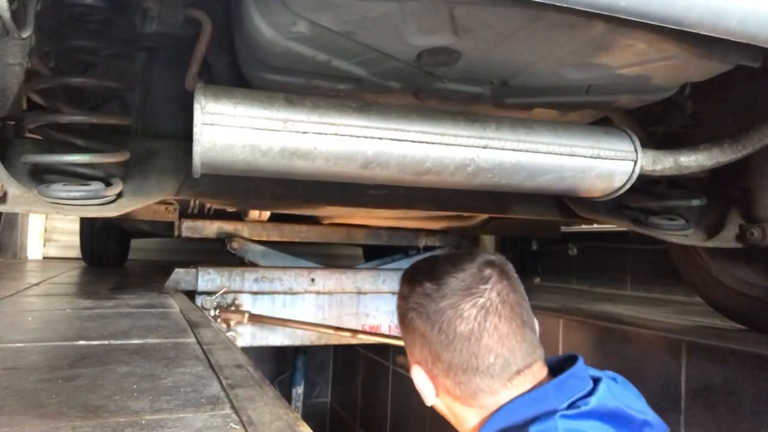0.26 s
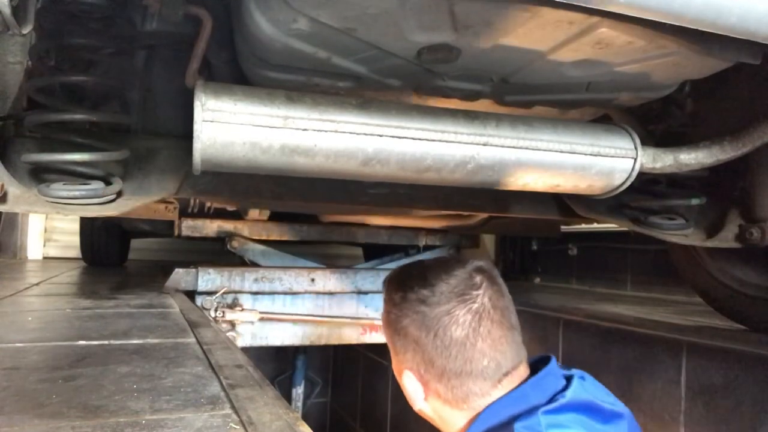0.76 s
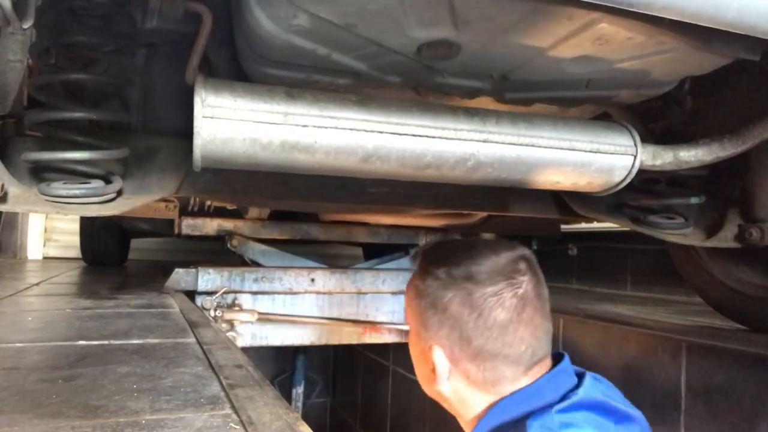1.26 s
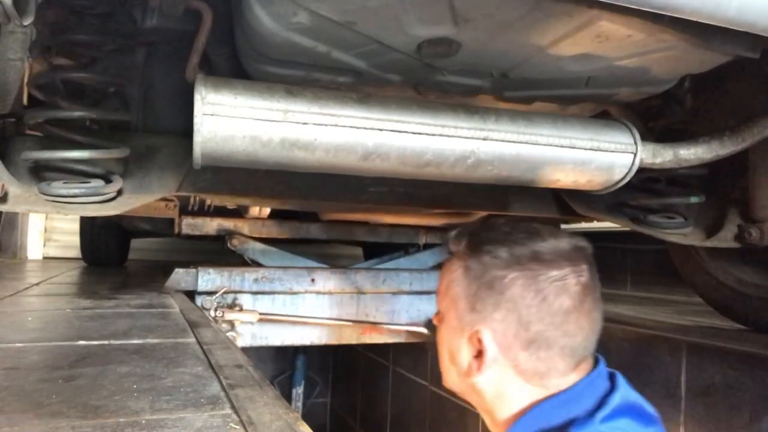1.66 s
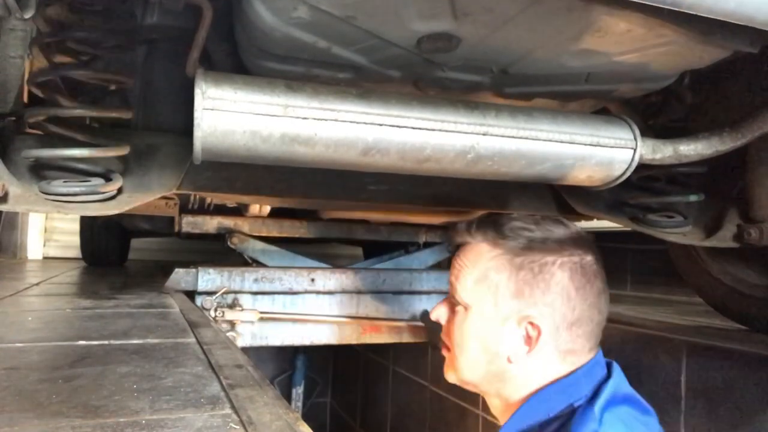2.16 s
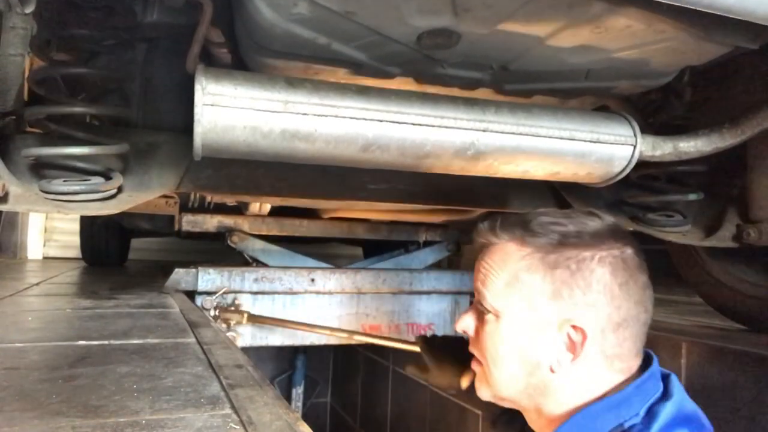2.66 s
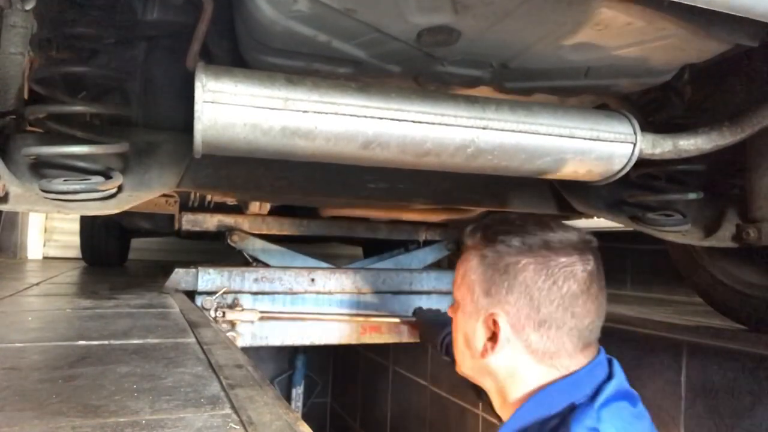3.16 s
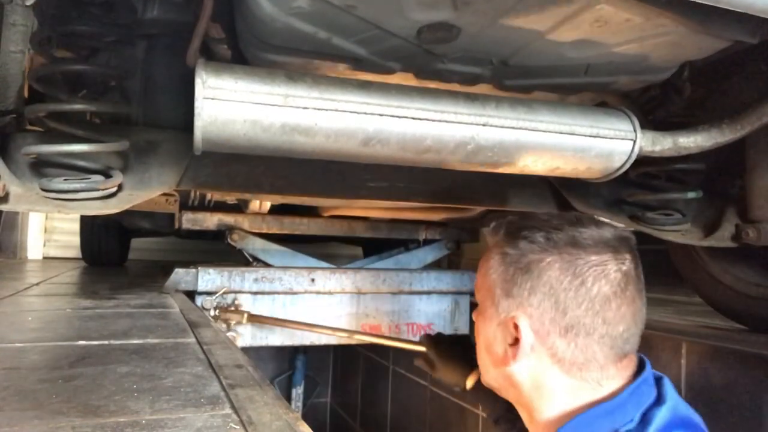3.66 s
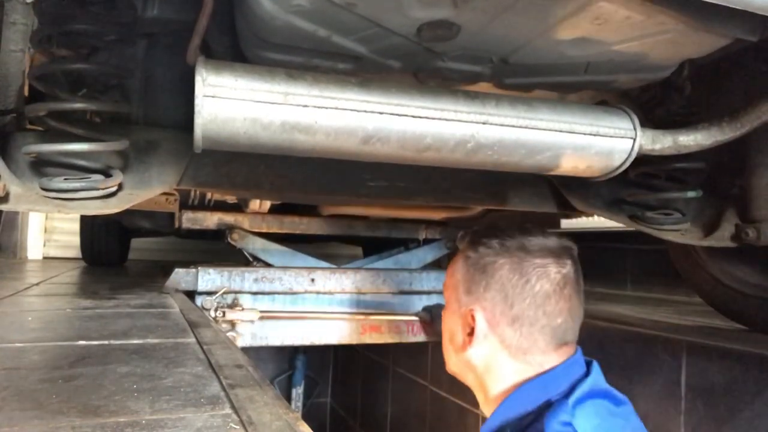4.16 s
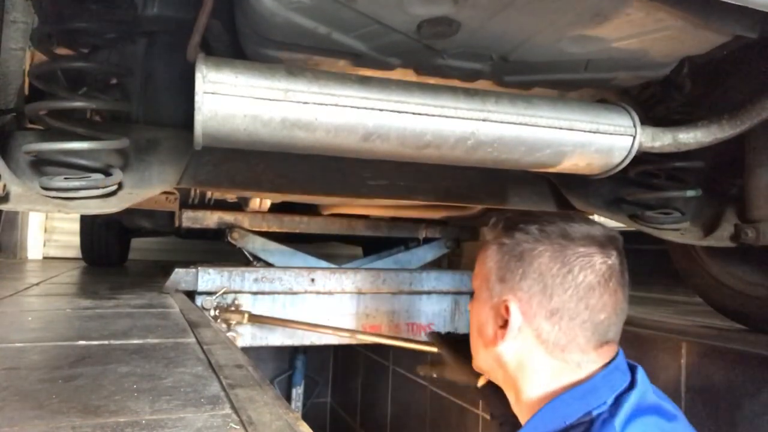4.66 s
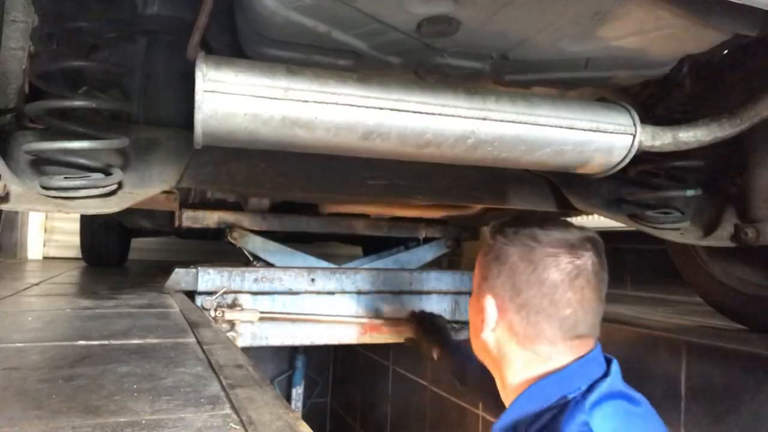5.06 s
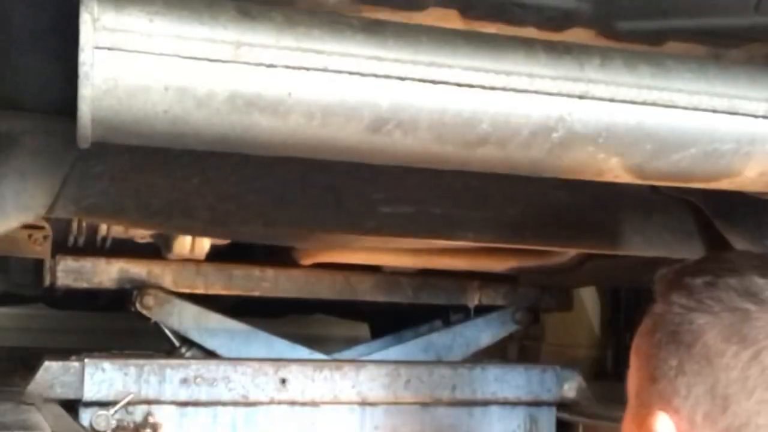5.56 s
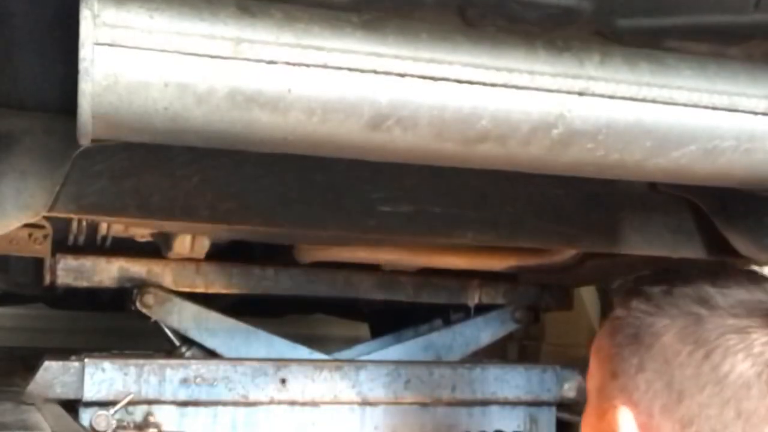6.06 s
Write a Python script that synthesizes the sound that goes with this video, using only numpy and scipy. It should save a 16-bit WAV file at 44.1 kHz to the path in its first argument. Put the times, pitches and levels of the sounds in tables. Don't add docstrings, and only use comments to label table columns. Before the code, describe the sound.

A hydraulic jack is pumped by hand beneath a car in a hard, narrow garage pit, heard fairly close. Steel lever knocks begin at 0.1 seconds and recur roughly every 0.4 to 0.5 seconds until 6.0, each preceded by light ticks as play is taken up, and often trailed by dull thunks or loose pin rattles. A sharp scrape comes at 0.4. At 0.93 the load slips with the loudest dense metallic crack; smaller cracks follow at 3.03 and a strong jerky cluster at 3.58 to 3.62. Short gritty scrapes fall between strokes, notably around 1.8, 3.5 and 4.6. Thin, very faint squeaks flick by, clearest near 0.5 and 2.8. Oil hisses faintly, surging around the blows. The car body answers with soft low booms and a quiet rumble. An extra thunk lands at 5.75. Everything has a short, dense echo over near-silent room air.

```python
import sys
import numpy as np
from scipy import signal
from scipy.fft import rfft, irfft, next_fast_len
from scipy.io import wavfile
from scipy.ndimage import uniform_filter1d

SR = 44100
rng = np.random.default_rng(int(sys.argv[2]) if len(sys.argv) > 2 else 0)


def makeup_ratio(level_db):
    decades = np.asarray(level_db, float) / 20
    return 10 ** decades


def bounce(signal):
    frames = np.transpose(np.atleast_2d(signal))
    limited = np.clip(frames, -1, 1)
    pcm = np.round(limited * 32767).astype(np.int16)
    wavfile.write(sys.argv[1], SR, pcm)


N = 278712

# start_s, strength_db, frame_weight_db, thud_db, brightness_db
KNOCKS = [(0.0824, -42, 2, 6, -12.5), (0.096, -33, 7.5, -5.5, -15), (0.4607, -35.5, -3.5, -4, -11.5),
          (0.8987, -31.5, 7, -7, -14), (1.3115, -37.5, -1, -4.5, -11), (1.7313, -32, 8.5, -3, -12),
          (2.134, -36.5, -3, -2, -13), (2.5518, -29.5, 4, -6, -13), (2.9783, -34.5, 0.5, -2, -13.5),
          (3.4214, -35, 6.5, -2, -10.5), (3.946, -36, 3, 3.5, -15), (4.0084, -44.5, 10, 1, -7),
          (4.4581, -34, 3, -6.5, -11.5), (5.0161, -37.5, 3.5, 3.5, -14), (5.5169, -33.5, 3, -9, -14),
          (6.0411, -38.5, 2.5, 0, -12)]
# start_s, strength_db, weight_db, brightness_db, edge_sharpness_db
CRACKS = [
    (0.9265, -17, -21, -1, -11),
    (0.9312, -17, -3.5, -10.5, -59),
    (0.939, -24.5, -9.5, -5, -13),
    (3.0206, -35.5, -9, 4, -3),
    (3.0333, -25.5, -6, 5.5, -13),
    (3.046, -29, -2.5, -3, -57),
    (3.5831, -25, -11, 6, -14.5),
    (3.588, -21.5, -7.5, -9, -29.5),
    (3.598, -26.5, -4, -4.5, -29.5),
    (3.6165, -36.5, -4.5, 1.5, -30.5),
]
HEAVY_PARTS = { "thud": (120, 330, 0.016, -0.31, [(179.3, -0.5, 0.33), (299, 0, 0.22), (338, -12.5, .6)]),
               "frame": (340, 800, .009, 9.5, [(425, -7, .18), (525, -11, .14), (561, -2, .24),
               (618, -5, .2), (664, -6, .2), (732, -13, .15)]),
               "beam": (400, 800, 0.0074, 2, [(430, -4, .15), (515, -1, .14), (559, -1, 0.24),
               (619.4, -2, 0.17), (740, -5, 0.1)]), "tube": (950, 1400, 0.004, 3.7, [(873, -12, 0.15),
               (1124, -8.5, 0.19), (1163.5, 1, 0.22), (1327, -10, 0.13)]),
               "bar": (950, 1100, .01, 6, [(1012, -4, .3), (1034, 0, .36)]), }
THIN_PARTS = { "plate": (930, 1500, 0.0052, -14.5, [(1030, 0, .35), (1311, -3.5, 0.034)]),
              "arm": (1290, 2680, 0.0039, -7, [(1800, 0.5, 0.16), (2290, -4.5, 0.11)]),
              "pin": (2175, 4440, .001, -21.5, [(3200, 3, 0.095), (4100, -6.5, 0.07)]),
              "sheen": (6730, 8850, 0.00078, -10, [(8000, -2.5, 0.069), (8000, -0.5, 0.061)]),
              "shank": (4500, 6400, 0.001, -7.5, [(4900, -1, 0.052), (5150, -1, 0.085),
              (6220, -1.5, 0.056)]), "slab": (780, 2320, 0.0021, -12, [(840, 0, .1), (1136, -2, .08),
              (1620, -2, .08), (2110, -3, .08)]), "ping": (2600, 3800, .0006, 13, [(3077, 2.5, 0.065),
              (3152, -1, 0.044), (2670, -15, 0.092), (3880, -8, 0.044), (5340, -7, 0.04)]),
              "top": (10800, 13800, .001, -12.5, [(11700, -.5, .04)]),
              "crest": (13800, 14000, .001, -20, [(14620, 0, .03)]),
              "socket": (3300, 3600, 0.0012, 18, [(2855, 4.5, 0.038), (3133, -3, 0.022), (3938, -5, 0.09)]),
              }
PARTS = {**HEAVY_PARTS, **THIN_PARTS}


def rms_one(x):
    return x / np.sqrt(np.mean(x ** 2) + 1e-20)


def loudest_one(x):
    return x / np.sqrt(uniform_filter1d(x ** 2, size=SR // 125).max())


def at_hz(points, hz):
    table_hz, values = np.array(points).T
    return np.interp(np.log(hz), np.log(table_hz), values)


def band(x, low_hz, high_hz, order=2):
    limits_hz = [low_hz, min(high_hz, 0.45 * SR)]
    return signal.sosfilt(signal.butter(order, limits_hz, "band", fs=SR, output="sos"), x)


def drift(rate_hz):
    r = np.exp(-80 * np.pi * rate_hz / SR)
    draws = rng.standard_normal(N // 40 + 2002)
    slow = signal.lfilter([1], [1, -2 * r, r * r], draws)[2000:]
    return np.interp(np.arange(N) / 40, np.arange(len(slow)), rms_one(slow))


def banded_noise(spectrum, patchy_db, rate_hz):
    edges_hz = np.geomspace(spectrum[0][0], min(spectrum[-1][0], 0.4 * SR), num=15)
    white = rng.standard_normal((2, N))
    out = 0
    for k, (low_hz, high_hz) in enumerate(zip(edges_hz, edges_hz[1:])):
        level_db = at_hz(spectrum, np.sqrt(low_hz * high_hz))
        gain = makeup_ratio(level_db + patchy_db * drift(rate_hz))
        out = out + gain * band(white[k % 2], low_hz, high_hz)
    return rms_one(out)


def pit(hz, size=SR):
    # pitch_hz, t60_s
    pit_t60 = [(150, 0.54), (500, 0.31), (1100, 0.27), (2000, 0.25), (3500, 0.23), (6500, 0.2),
               (13000, 0.16)]
    t = np.arange(size) / SR
    pit_tail = makeup_ratio(-60 * t / at_hz(pit_t60, hz))
    hall_tail = makeup_ratio(-30 - 60 * t / 0.37)
    fill_in = 1 - np.exp(-t / 0.0012)
    response = makeup_ratio(-18.5) * (pit_tail + hall_tail) * fill_in * rng.standard_normal(size)
    response[0] = 1
    return response


def quiet():
    # pitch_hz, level_db per Hz
    quiet_tone = [(240, -31.5), (400, 8.5), (545, -9.5), (906, -34.5), (1030, 4.5), (1490, -11.5),
                  (2840, -16.5), (7990, -11), (10200, -12.5), (14800, -15), (15800, -17)]
    return makeup_ratio(-70.5) * banded_noise(quiet_tone, patchy_db=2.5, rate_hz=4.8)


def rumble():
    # pitch_hz, level_db per Hz
    rumble_tone = [(15, -39.5), (25, -19.5), (54, 1.5), (87, 2), (226, -14), (318, -13), (477, -22),
                   (551, -31.5), (788, -32), (1020, -31.5), (1200, -15.5), (1560, -56.5), (2640, -120)]
    # time_s, level_db
    sway = [(0.0, -48), (0.35, -52), (0.93, -52), (1.09, -46), (1.18, -49.5), (1.49, -53.5), (2.59, -50),
            (2.75, -54), (3.06, -43.5), (3.2, -52), (4.01, -50), (4.49, -53.5), (4.68, -53), (4.94, -56.5),
            (5.1, -49.5), (5.53, -55), (6.02, -44.5), (6.32, -51.5)]
    sway_db = np.interp(np.arange(N) / SR, *np.transpose(sway))
    return makeup_ratio(sway_db - 0.5) * banded_noise(rumble_tone, patchy_db=0.0, rate_hz=2.1)


def surge(s, strength_db, top_db, follows, lag_s, rise, fall, rest_db):
    coarse = np.arange(0, N, 64)
    late_s = coarse[:, None] / SR - np.array(s) - lag_s
    top = top_db + follows * (strength_db - np.median(strength_db))
    peaks = top + np.minimum(rise * late_s, -fall * late_s)
    return np.interp(np.arange(N), coarse, np.maximum(peaks.max(axis=1), rest_db))


def hiss():
    # pitch_hz, level_db per Hz
    hiss_tone = [(410, -32.5), (700, 1), (852, -6.5), (984, -10), (1300, -12), (2800, -9.5), (4800, -17.5),
                 (5400, -10.5), (14800, -32.5), (16000, -40)]
    # time_s, level_db
    effort = [(0, 5), (.7, -2), (1.15, 2), (1.6, -4.5), (2.3, -1.5), (3.3, 2), (3.75, -3.5), (4.3, -2.5),
              (4.8, -1.5), (5.3, -3), (5.8, -2.5), (6.32, -1)]
    # top_db, share of the blow's strength swing, lag_s, rise (dB/s), fall (dB/s), rest_db
    hiss_surge = (-58, 0.3052, 0.57, 115, 107, -69)
    effort_db = np.interp(np.arange(N) / SR, *np.transpose(effort))
    start_s, strength_db = np.array([row[:2] for row in KNOCKS + CRACKS]).T
    level_db = effort_db + surge(start_s, strength_db, *hiss_surge)
    return makeup_ratio(level_db) * banded_noise(hiss_tone, patchy_db=0.0, rate_hz=17)


def booms():
    # start_s, pitch_hz, peak_db, t60_s
    boom_rows = [(0.106, 78.8, -38, 0.31), (0.462, 76, -34, 0.18), (0.907, 81.7, -32, 0.26),
                 (0.991, 63.1, -44, 1.5), (2.2, 62, -54, 1.5), (3.06, 64, -57, 1.5), (4.06, 62, -48.5, 1.5),
                 (5.05, 63, -49, 1.2), (1.327, 109.8, -45, 0.21), (.11, 334, -52, 0.64),
                 (.91, 334, -51, 0.84), (1.74, 334, -53, 0.72), (2.56, 334, -52, 0.62),
                 (3.43, 334, -56.5, .7), (3.96, 185, -43.5, 0.63), (3.96, 334, -53.5, 0.62),
                 (5.02, 338, -52.5, 0.64), (5.75, 312, -53.5, 0.67), (6.05, 306, -51, 0.61),
                 (1.737, 77, -36, 0.27), (2.14, 114.6, -44, 0.44), (2.557, 76, -40, 0.44),
                 (2.768, 107, -46.5, 0.34), (2.986, 119, -38.5, 0.18), (3.427, 80.3, -42.5, 0.44),
                 (3.66, 96, -42.5, 0.2), (3.95, 87.5, -37, 0.21), (4.01, 115, -40.5, 0.49),
                 (4.462, 84.8, -38.5, 0.23), (5.018, 112.7, -39.5, 0.74), (5.522, 78, -40.5, 0.31),
                 (5.756, 79.5, -41, 0.32), (5.769, 112.7, -42, 0.82), (6.044, 119, -39, 0.4)]
    t = np.arange(SR) / SR
    swell = 1 - np.exp(-t / 0.0066)
    out = np.zeros(N + SR)
    for start_s, hz, db, t60 in boom_rows:
        at = round(start_s * SR)
        out[at:at + SR] += makeup_ratio(db + 6.5 - 60 * t / t60) * swell * np.sin(2 * np.pi * hz * t)
    return out[:N]


def squeaks():
    # start_s, length_s, first_hz, toward_hz (about two thirds of the way is covered), level_db
    squeak_rows = [(.637, 0.068, 15000, 11000, -65), (1.488, .055, 10250, 15000, -69),
                   (2.308, 0.03, 13000, 12000, -66.5), (2.315, .05, 11000, 9560, -72),
                   (2.345, .03, 11000, 11000, -71), (2.3, .03, 10450, 10300, -76),
                   (0.494, .04, 11700, 11340, -55), (2.8, .04, 9000, 9500, -52),
                   (2.663, 0.046, 11800, 11750, -64), (3.79, .045, 6500, 6220, -65),
                   (4.204, .12, 3800, 2740, -72.5), (4.11, 0.06, 5620, 5600, -72),
                   (4.55, 0.12, 5350, 5300, -60), (4.63, 0.035, 3100, 3100, -58),
                   (4.58, .08, 6200, 6100, -64), (3.9, .06, 8050, 7200, -63), (4.83, .07, 2400, 2400, -71),
                   (5.4, .06, 2200, 2190, -70), (4.11, 0.037, 15000, 9370, -67),
                   (5.12, .05, 9000, 9900, -71), (5.171, .07, 18000, 8700, -66.5),
                   (6.217, 0.12, 23000, 9200, -66.5)]
    t = np.arange(N) / SR
    out = np.zeros(N)
    wobble = 1 + 0.004 * drift(60)
    flutter = makeup_ratio(4.5 * drift(70) + 0.5)
    for start_s, length_s, first_hz, toward_hz, db in squeak_rows:
        end_s = start_s + length_s
        times_s = [start_s - 0.01, start_s, start_s + 0.35 * length_s, end_s, end_s + 0.01]
        level = makeup_ratio(np.interp(t, times_s, [-110, db - 9, db, db - 9, -110]))
        part = np.clip((t - start_s) / length_s, 0, 1)
        hz = toward_hz + (first_hz - toward_hz) * np.exp(-part / 0.98)
        out += level * flutter * np.sin(2 * np.pi * np.cumsum(hz * wobble) / SR)
    return out


def scrapes():
    # start_s, end_s, scrape_db, top_db
    scrape_rows = [(0.383, 0.445, -47.5, -74), (0.63, 0.694, -69.5, -85), (1.788, 1.976, -55, -82),
                   (2.60, 2.728, -59, -67), (1.182, 1.392, -59, -66), (3.285, 3.285, -51, -65),
                   (3.517, 3.604, -51, -68), (3.833, 3.944, -56.5, -73), (4.065, 4.168, -64.5, -70),
                   (4.532, 4.663, -52, -73), (4.878, 5.012, -60.5, -62.5), (5.11, 5.25, -64.5, -81.5),
                   (5.58, 5.73, -57, -70), (5.746, 5.78, -58.5, -66), (6.184, 6.225, -63, -70)]
    # pitch_hz, level_db per Hz
    scrape_tone = [(710, -27), (1200, -6), (1980, -10.5), (2780, -7), (3510, -7.5), (5410, -8),
                   (8200, -11.5), (9500, -18), (12400, -52), (20900, -120)]
    t = np.arange(N) / SR
    grains = rng.standard_normal(N) * makeup_ratio(3 * drift(80))
    body = banded_noise(scrape_tone, patchy_db=1.5, rate_hz=7.2) * makeup_ratio(1.9 * drift(90) - 1.0)
    top = rms_one(band(grains, 7700, 13600))
    out = np.zeros(N)
    for start, end, db, top_db in scrape_rows:
        stroke = makeup_ratio(np.interp(t, [start - 0.012, start, end, end + 0.11], [-35, -4, -3, -35]))
        sliding = (t > start - 0.012) * (t < end + 0.07)
        out += stroke * sliding * (makeup_ratio(db) * body + makeup_ratio(top_db) * top)
    return out


def cracks():
    crack_law = {"plate": (-10, 2.5, 1, 0), "arm": (-6.5, 0.5, 0, 0), "slab": (-12, 1.2, -0.5, 0),
                 "pin": (0.42, 0, 0, 0), "sheen": (-2.5, 0.06, 1, 0.016),
                 "shank": (-1.8, -0.075, 0.77, 0.013), "top": (0.86, 0, 0, 0.91), "crest": (-6, 0, 0, 0.98)}
    # pitch_hz, width_hz, level_db over the burst
    slip_rings = [(1800, 40, 6.5), (2180, 45, 7), (2950, 60, 6), (3400, 35, 7.5), (4020, 68, 6),
                  (4250, 40, 6), (4650, 30, 6), (4860, 25, 5.5), (5300, 56, 7), (6270, 50, 7),
                  (7410, 45, 3.5), (7760, 54, 6), (8280, 80, 5.5)]
    t = np.arange(SR // 2) / SR
    swell = 1 - np.exp(-t / 0.002)
    shape = swell * (1 + makeup_ratio(-4) * np.exp(-t / 0.014))
    out = np.zeros(N + SR)
    for start_s, db, *colour in CRACKS:
        at = round((start_s - 0.0015) * SR)
        for name, (over_db, *shares) in crack_law.items():
            low_hz, high_hz = PARTS[name][:2]
            dense = band(pit(np.sqrt(low_hz * high_hz), size=SR // 2), low_hz, high_hz, order=5)
            gain = makeup_ratio(db + over_db + np.dot(colour, shares))
            out[at:at + len(t)] += gain * loudest_one(dense * shape)
    burst = out[:N] * makeup_ratio(2 * drift(250) - 2.5) + 1e-18
    coloured = burst
    for hz, width_hz, db in slip_rings:
        b, a = signal.iirpeak(hz, hz / width_hz, fs=SR)
        coloured = coloured + (makeup_ratio(db) - 1) * signal.lfilter(b, a, burst)
    return coloured


def part_response(name):
    low_hz, high_hz, swell_s, clear_db, modes = PARTS[name]
    t = np.arange(SR) / SR
    swell = 1 - np.exp(-t / swell_s)
    clear = sum(makeup_ratio(db - 60 * t / t60) * np.sin(2 * np.pi * hz * t) for hz, db, t60 in modes)
    dense = band(pit(np.sqrt(low_hz * high_hz)), low_hz, high_hz, order=4)
    return loudest_one(makeup_ratio(clear_db) * loudest_one(clear * swell) + loudest_one(dense * swell))


def contacts(rows, law, chatter_s, chatter_db, trim_db):
    rows = np.array(rows)
    t = np.arange(SR // 40) / SR
    chatter = rng.standard_normal((len(rows), len(t))) * np.exp(-t / chatter_s)
    chatter[:, 0] = makeup_ratio(-chatter_db) * np.sqrt(np.sum(chatter ** 2, axis=1))
    chatter /= np.sqrt(np.sum(chatter ** 2, axis=1, keepdims=True))
    starts = np.round((rows[:, :1] - 0.0015) * SR).astype(int)
    at = starts + np.arange(len(t))
    forces = {}
    for name, (over_db, *shares) in law.items():
        level_db = rows[:, 1] + over_db + rows[:, 2:] @ shares + trim_db
        forces[name] = np.zeros(N + SR)
        np.add.at(forces[name], at, chatter * makeup_ratio(level_db)[:, None])
    return forces


def thunks():
    # start_s, strength_db, weight_db, brightness_db
    thunk_rows = [(0.48, -35, -34, -26), (1.235, -45, 0, -7), (1.335, -35.5, -19, -24),
                  (2.0584, -51.5, 2, 0), (2.15, -38, -18, -26), (2.757, -37.5, -0.5, -10.5),
                  (2.785, -49, -14, -39), (2.998, -32.5, -42, -38), (3.1924, -46, -16, -33),
                  (3.588, -39.5, -8, 0), (3.6544, -34.5, -4.5, -10), (3.82, -50, -2.5, -5),
                  (3.87, -47, 3, -10), (4.055, -42, -10, -17), (4.08, -46, -10.5, -28),
                  (3.97, -36, -6, -32), (4.022, -34, -32, -30), (4.391, -51, 6.5, -7),
                  (4.48, -37, -38, -10), (4.868, -48.5, 0, -11.5), (5.04, -36, -22, -19),
                  (5.2654, -49.5, -22, -19), (5.3, -54.5, -13, -29), (5.4394, -57, 10.5, -8),
                  (5.7465, -32.5, -5, -5.5), (5.78, -57, 15, -13), (5.9335, -51, 2.5, -16),
                  (6.0634, -32, -34, -24)]
    thunk_law = {"thud": (0, 0.99, 0), "beam": (0, 0, 0), "plate": (-6.5, 0, 0.41), "slab": (0.65, 0, .9),
                 "pin": (-24.5, 0, 0.79)}
    return contacts(thunk_rows, thunk_law, chatter_s=0.013, chatter_db=-1.5, trim_db=-1.5)


def ticks():
    # start_s, strength_db,
    # weight_db, brightness_db
    tick_rows = [(0.0653, -56, 9, -10), (0.3835, -52.5, -4, -9), (0.4124, -57, 9, -15),
                 (0.4444, -50, 5.5, -16), (0.8694, -42.5, -5, -13.5), (0.885, -39.5, -15, -14),
                 (0.9155, -49, -10, 2), (0.842, -65, 13, -23), (1.2291, -58, 11, -19),
                 (1.2615, -47, 3.5, -29.5), (1.6536, -60.5, 4.5, -32), (1.699, -46, 1.5, -25),
                 (2.051, -52, 4.5, -17), (2.0862, -37.5, -4, -12), (2.4808, -60, 3.5, -23.5),
                 (2.5137, -46.5, 2, -19), (2.868, -59.5, 13, -18), (2.9228, -51, 7.5, -25),
                 (2.945, -50, -17, -14), (3.3687, -47, -1, -20), (3.8482, -41, -2.5, -20),
                 (4.4054, -46.5, -2.5, -24.5), (4.4373, -46, 5.5, -11), (4.9053, -45, -12.5, -31),
                 (4.93, -48.5, -2, -16), (5.4645, -50.5, -2, -35), (5.4944, -43.5, 1.5, -6),
                 (5.9559, -44.5, -1, -24),
                 (0.5109, -42.5, -29, -10), (0.624, -61, -11, -11), (1.3793, -71, -19, 7),
                   (0.83, -68, -19, 8), (0.85, -57, 4, -15), (3.359, -59.5, -5, -15), (3.5, -66, -10, 8),
                   (2.2044, -62, 5.5, 8.5), (2.6883, -51, -15, -17), (3.2695, -60.5, -10.5, -22),
                   (3.2928, -64.5, -13, 0), (5.558, -51, -14, -3), (6.1854, -60, -11, -1),
                   (0.083, -58, -7, 9)]
    tick_law = {"beam": (0, 1, 0), "arm": (-7, .2, 0), "pin": (0, 0, 0), "sheen": (-5, 0, 0.49),
                "top": (0, 0, 0.97), "crest": (-16, 0, 0.95)}
    forces = contacts(tick_rows, tick_law, chatter_s=0.0023, chatter_db=-3.0, trim_db=-0.5)
    edge = makeup_ratio(23) * forces["top"]
    forces["socket"] = makeup_ratio(-3) * forces["pin"]
    forces["shank"] = makeup_ratio(0.5) * forces["sheen"]
    forces["pin"] = makeup_ratio(-3.5) * forces["pin"]
    forces["top"] = makeup_ratio(-6.5) * forces["top"]
    return forces, edge


def knocks():
    knock_law = {"thud": (-3, 0, 1, 0), "frame": (-1.2, 1, -0.063, -0.076), "tube": (-15.5, 1.73, 0, 0),
                 "pin": (0, 0, 0, 0), "sheen": (-4.5, 0, 0.5, 1), "shank": (3, 0.42, 0, 1.36),
                 "ping": (-1.5, -0.99, 0, -0.081), "socket": (-7.5, 0.5, -0.5, 0)}
    forces = contacts(KNOCKS, knock_law, chatter_s=0.0013, chatter_db=-6.0, trim_db=3.0)
    edge = makeup_ratio(11.5) * forces["sheen"]
    forces["arm"] = makeup_ratio(-8.5) * forces["pin"]
    forces["top"] = makeup_ratio(-18.5) * forces["sheen"]
    forces["crest"] = makeup_ratio(-25) * forces["sheen"]
    forces["bar"] = makeup_ratio(-19) * forces["frame"]
    forces["frame"] = makeup_ratio(-3.5) * forces["frame"]
    forces["pin"] = makeup_ratio(-6.5) * forces["pin"]
    return forces, edge


def jack():
    knock_forces, knock_edge = knocks()
    tick_forces, tick_edge = ticks()
    blows = [knock_forces, thunks(), tick_forces]
    stance = np.arange(N + SR) // (SR // 3) % 3
    size = next_fast_len(N + SR + SR // 20)
    rung = 0
    for name in PARTS:
        force = sum(blow.get(name, 0) for blow in blows)
        for k in range(3):
            rung = rung + rfft(force * (stance == k), size) * rfft(part_response(name), size)
    sharp = band((knock_edge + tick_edge)[:N], 6400, 16000)
    clack = makeup_ratio(9) * band(knock_forces["ping"][:N], 1500, 6500)
    return irfft(rung, size)[:N] + sharp + clack


def scene():
    background = quiet() + rumble() + hiss()
    return (background + booms() + squeaks() + scrapes() + cracks() + jack())[None]


def roll_off(x):
    return signal.sosfilt(signal.butter(12, 16820, fs=SR, output="sos"), x)


def record(dry):
    dip_hz, dip_width_hz, dip_share = 10400, 2000, 0.46
    b, a = signal.iirpeak(dip_hz, dip_hz / dip_width_hz, fs=SR)
    dipped = dry - dip_share * signal.lfilter(b, a, dry)
    no_deep_bass = signal.sosfilt(signal.butter(2, 42, "high", fs=SR, output="sos"), dipped)
    finished = signal.sosfilt(signal.cheby2(12, 60, 16350, fs=SR, output="sos"), no_deep_bass)
    return roll_off(finished)


dry = scene()
out = record(dry)
bounce(out)
```